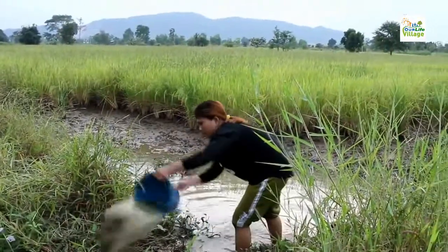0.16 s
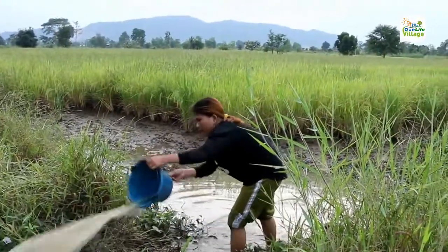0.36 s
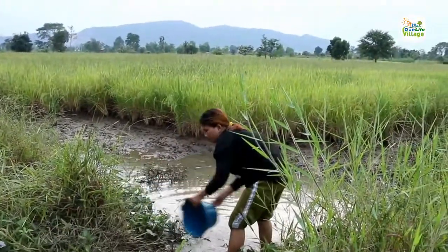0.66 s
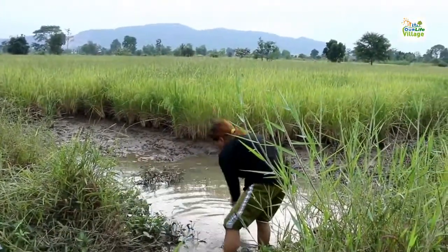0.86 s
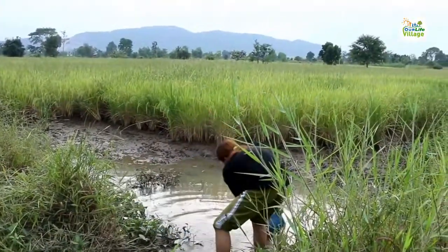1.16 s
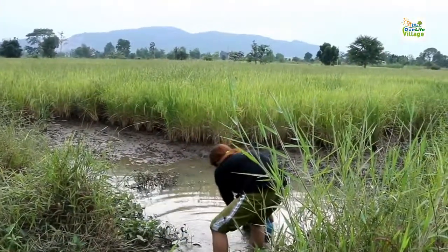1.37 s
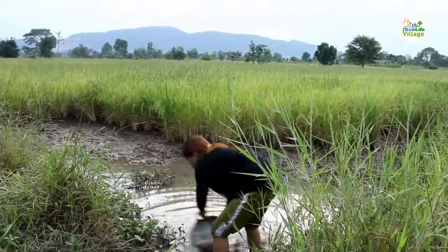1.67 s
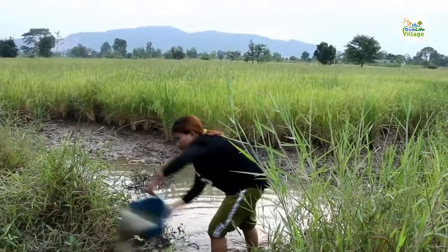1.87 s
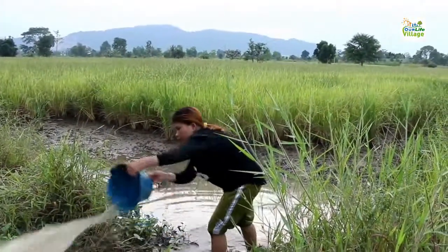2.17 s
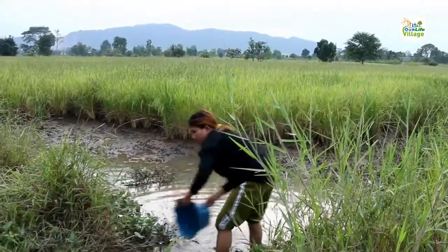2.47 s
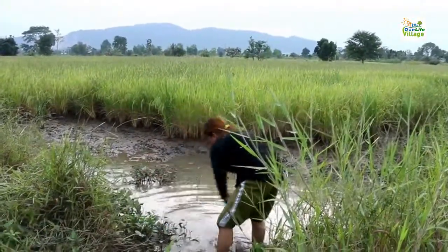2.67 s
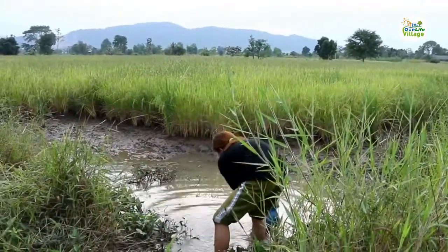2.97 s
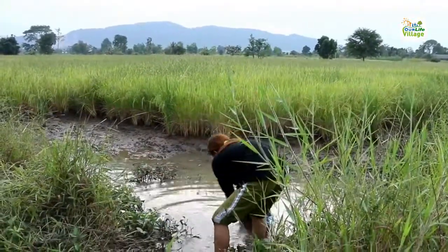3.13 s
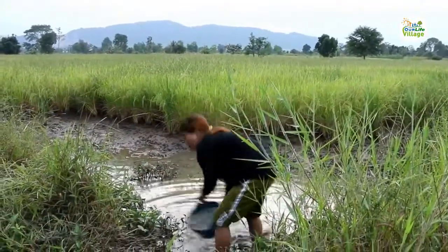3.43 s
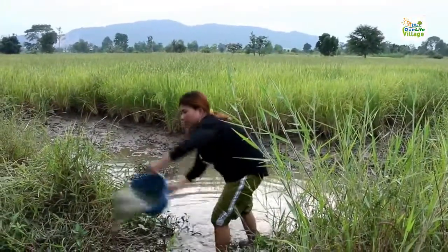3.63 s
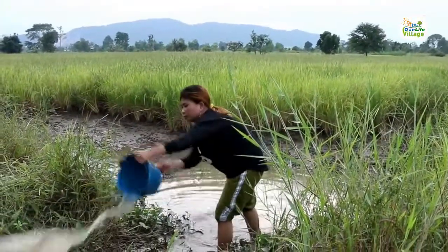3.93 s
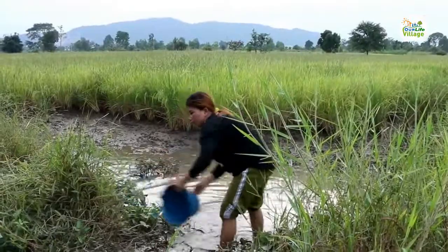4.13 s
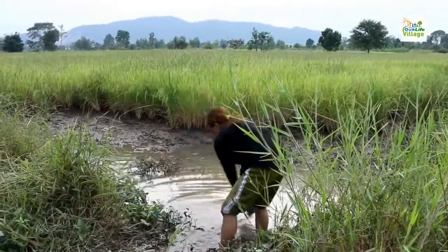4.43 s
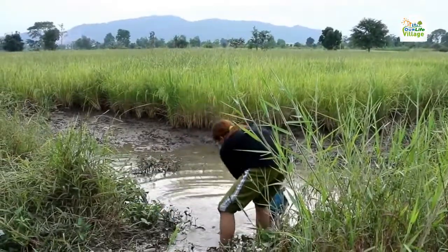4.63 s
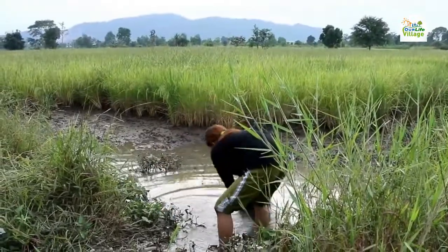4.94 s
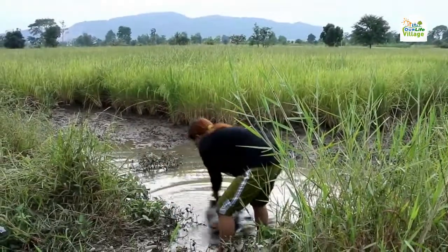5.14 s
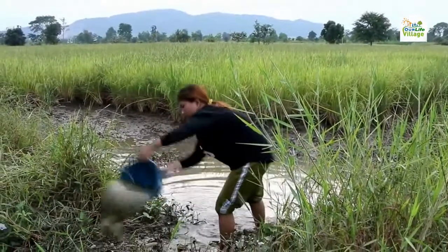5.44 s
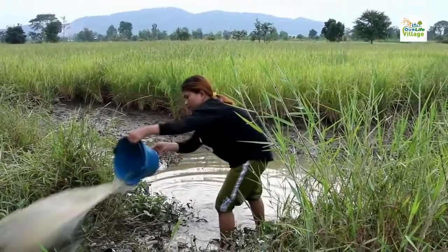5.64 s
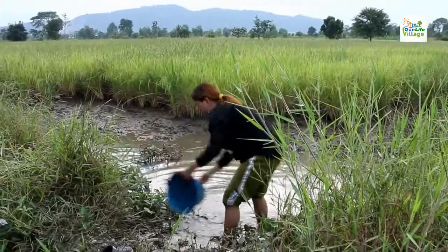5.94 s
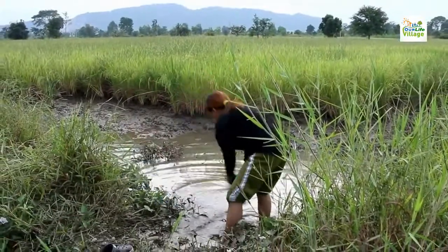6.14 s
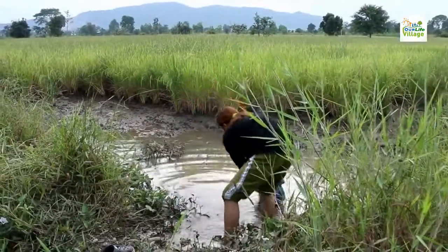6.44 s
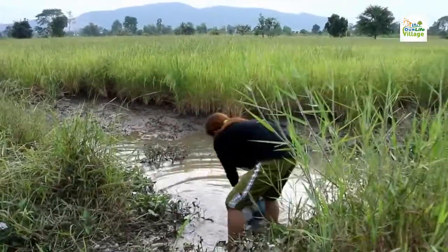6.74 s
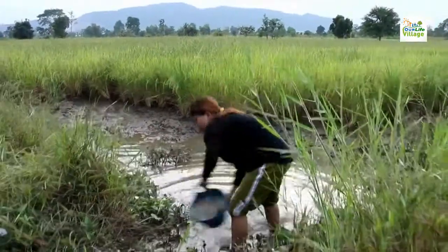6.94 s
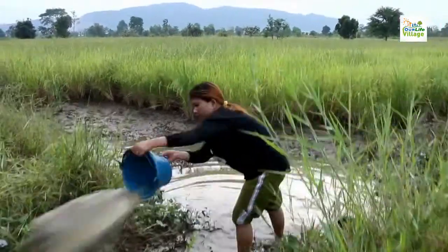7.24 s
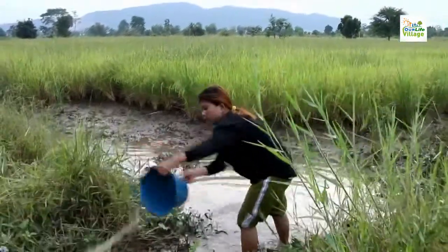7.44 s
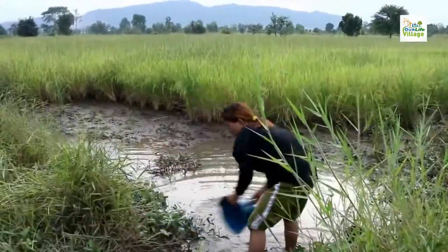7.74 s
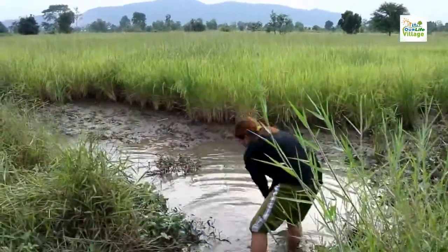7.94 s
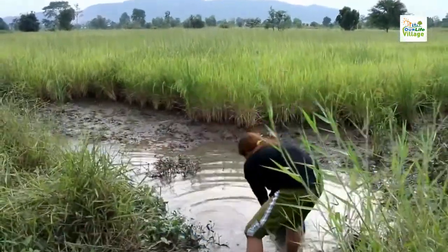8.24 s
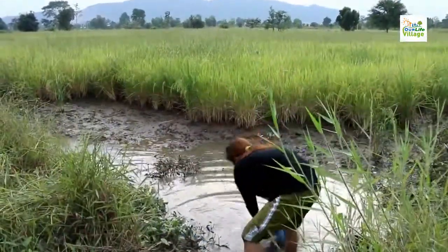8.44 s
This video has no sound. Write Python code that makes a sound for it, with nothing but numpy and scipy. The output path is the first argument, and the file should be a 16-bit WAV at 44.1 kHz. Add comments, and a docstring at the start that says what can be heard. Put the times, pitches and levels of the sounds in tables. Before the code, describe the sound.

Muddy pond water is scooped with a plastic basin and flung splashing onto the bank, five times in steady rhythm, over low distant traffic rumble.

```python
"""At the edge of a shallow muddy pond, two microphones: far traffic rumbles and hisses (shaped noise) and insects
buzz in the grass (chopped, ringing noise) throughout, while water fizzes and gurgles close by (rains of tiny bubbles).
Gulps and drips (rising, damped sines with noise splats) start at once; from 0.4 s a plastic basin flings
water on the bank to the left, five times (bubble rains and noise under landing curves).
At 2.75 s a bird calls once, a gliding sine."""
import sys
import numpy as np
from scipy import signal
from scipy.fft import rfft, irfft, next_fast_len
from scipy.io import wavfile
from scipy.ndimage import uniform_filter1d, map_coordinates

SR = 44100
rng = np.random.default_rng(int(sys.argv[2]) if len(sys.argv) > 2 else 0)


def dump(signal):
    """Clip the signal to [-1, 1] and save it as 16-bit WAV at the path in sys.argv[1]."""
    limited = np.clip(np.atleast_2d(signal).T, -1, 1)
    pcm = np.round(limited * 32767).astype(np.int16)
    wavfile.write(sys.argv[1], SR, pcm)


N = 379260
MS = np.arange(0, N / SR + .002, .001)  # the slow level curves are read every millisecond [s]

# Levels stand before the random flicker, pond reflection and microphone colour; spectra are relative levels.
# far road: (time [s], rumble level [dB], tyre hiss level [dB], passing lorry hiss level [dB])
ROAD_LEVELS = [(0, -42.5, -45, -50.5), (.7, -38, -46.5, -51), (1.6, -38.5, -45.5, -58),
               (2.3, -38.5, -50, -49.5), (3.5, -37.5, -46.5, -53.5), (4.4, -35, -47.5, -48),
               (5.3, -39.5, -44, -66), (6.05, -39, -47, -53.5), (6.7, -38.5, -43.5, -53.5),
               (8.07, -43, -45.5, -59), (8.6, -38, -43, -59)]
# spectra of engine rumble, tyre hiss and lorry hiss: (frequency [Hz], level [dB per Hz])
RUMBLE_SPECTRUM = [(13, -43), (22, -19.5), (87, 1), (130, 3), (166, -1), (216, -6.5), (420, -22.5),
                   (550, -40), (920, -120)]
TYRE_SPECTRUM = [(220, -7), (380, -17), (430, -10), (579, -10.5), (854, 0), (967, 1), (1080, -6),
                 (1240, -4.5), (1570, -14), (2110, -13), (3520, -24), (6990, -26.5), (7910, -21.5),
                 (14500, -44), (15700, -54)]
LORRY_SPECTRUM = [(900, -49), (1150, 2), (1350, 6), (1550, -1), (1950, -3), (2300, -27.5)]
# insect wing resonances: (frequency [Hz], width [Hz], level [dB])
WING_BANDS = [(7800, 480, 6), (8970, 730, 3), (11900, 4000, -13)]
# thin run-off that swells and thins between throws: (time [s], fizz level [dB], gurgle level [dB])
TRICKLE_LEVELS = [(0, -52, -49), (.34, -49, -52), (.39, -54, -58), (.9, -52, -61), (1.29, -72, -59),
                  (1.6, -61, -54), (1.93, -47, -49.5), (2.16, -59, -50.5), (2.75, -54.5, -52),
                  (3.1, -65, -54.5), (3.45, -54, -53), (3.74, -54.5, -52.5), (4.45, -63, -63),
                  (5.0, -70, -59), (5.48, -44.5, -51), (5.68, -54, -66), (6.25, -62, -69), (6.75, -81, -62),
                  (7.0, -62, -58), (7.35, -53, -64), (7.88, -53.5, -64), (8.2, -74, -78), (8.6, -67, -67)]
# water spilling back from basin and legs:
# (time [s], length [s], fizz level [dB], gurgle level [dB], churn level [dB])
SPILL_EVENTS = [(0, 0.056, -53.5, -47, -70), (0.267, .01, -44, -49, -44), (1.402, 0.0099, -64, -44, -39),
                (1.434, .02, -67, -53, -36), (1.51, .015, -58, -53, -48), (1.66, .02, -57, -48, -47),
                (1.754, 0.019, -46.5, -37, -54), (1.886, 0.038, -44, -45, -53), (1.98, .004, -43, -53, -62),
                (2.015, .02, -40.5, -45, -50), (2.121, .008, -58, -43.5, -51), (2.712, .004, -66, -54, -59),
                (2.884, .006, -66, -50, -50), (3.163, .025, -57, -50, -37), (3.385, .03, -55, -46, -40.5),
                (3.483, 0.038, -51.5, -52, -49), (3.529, .07, -55, -51, -64),
                (3.796, 0.023, -53, -49.5, -46), (4.822, 0.032, -56, -53, -48),
                (5.1, 0.023, -51, -44.5, -43), (5.268, .006, -49.5, -50, -55),
                (5.382, .04, -44.5, -47.5, -56), (5.474, 0.011, -41, -44, -48),
                (5.604, 0.0037, -51, -36.5, -44.5), (5.64, .004, -55, -52, -53),
                (6.165, 0.0037, -45.5, -48, -48), (6.258, 0.011, -61, -62, -44), (6.55, .2, -75, -64, -50),
                (6.804, .006, -54, -62, -43.5), (6.881, 0.011, -64, -51, -41),
                (6.937, 0.038, -53, -55, -46), (7.064, .006, -58, -45.5, -55),
                (7.228, .02, -45.5, -53, -48), (7.288, .02, -47.5, -48, -43.5), (7.94, .006, -65, -52, -52),
                (8.272, 0.054, -63, -64, -46), (8.522, .006, -55, -46, -53), (8.567, .05, -54, -50, -33)]
# spectra of fizz, gurgle and churn in the basin: (frequency [Hz], level [dB per Hz])
FIZZ_SPECTRUM = [(1470, -15), (2500, -2), (3670, -3.5), (4030, 1), (4420, -5), (5780, -7.5), (7170, -8.5),
                 (10500, -14.5), (15700, -24)]
GURGLE_SPECTRUM = [(250, -30), (450, -14), (1000, -0.5), (1800, 2.5), (2800, -1.5), (4500, -11.5),
                   (7000, -40)]
CHURN_SPECTRUM = [(150, -48), (280, 3.5), (400, 5.5), (600, -3), (1000, 3), (1500, -53)]
# big bubbles, then drips:
# (time [s], bubble peak level [dB], starting pitch [Hz], splat against bubble before SPLAT_GAIN [dB])
GULP_EVENTS = [(0.038, -34.5, 723, -7), (0.411, -33, 1010, -13), (0.531, -34, 816, -9),
               (0.575, -21, 1000, -7), (0.623, -16.5, 1020, 5.5), (1.409, -23, 369, -6),
               (1.44, -23, 360, 0.5), (1.573, -29, 874, -10), (1.663, -33, 382, -8),
               (1.754, -33.5, 886, -5), (2.12, -36, 1110, -4), (2.202, -31, 1060, -7),
               (2.352, -33, 991, -11), (2.419, -16.5, 357, -6), (3.161, -26, 374, 0.5),
               (3.223, -35, 372, -1), (3.969, -36, 1070, -8), (4.117, -26, 990, -11),
               (4.156, -20.5, 870, -1), (5.192, -34, 850, 1), (5.23, -32.5, 1020, -4),
               (5.715, -33, 1095, -3), (5.909, -15, 387, 0), (7.005, -32, 1010, -7),
               (7.051, -37.5, 740, -5), (7.354, -33, 996, -8), (7.542, -23, 320, -9),
               (7.934, -34.5, 990, -5), (8.246, -34, 945, 0), (8.278, -39, 918, -1), (8.437, -37, 980, -8),
               (8.519, -36, 956, -6), (8.542, -37, 875, -7), (8.563, -25.5, 514, -6)]
DRIP_EVENTS = [(0.127, -37.5, 2860, 6), (0.2653, -30.5, 3720, -5), (0.402, -33, 3020, 6),
               (0.5344, -26, 3300, -9), (0.5641, -20, 2110, -4), (1.412, -31, 1720, -3),
               (1.441, -37, 1880, -19), (1.6412, -40, 1890, 4), (1.6836, -23.5, 1380, -7),
               (1.7463, -34, 2600, 3), (1.7719, -27.5, 3340, -7), (1.8103, -34, 4250, -15),
               (1.8836, -37, 2010, -8), (1.9844, -28, 2040, -3), (2.06, -32, 2560, 1),
               (2.119, -37, 1720, -11), (2.1965, -38, 3000, -10), (2.2388, -29, 3020, -3),
               (2.302, -33, 2450, -17.5), (2.377, -28, 2170, -8), (3.083, -32.5, 1550, -16),
               (3.3823, -33, 1590, -11), (3.488, -37, 2480, -11), (3.7527, -32, 1370, -17),
               (3.7868, -35, 1590, -15), (3.832, -34, 1700, -14), (4.0891, -23, 1310, -7),
               (4.8406, -38.5, 1860, -7), (4.8604, -34, 1520, -17), (4.9791, -37, 2040, -10),
               (5.1023, -35, 2080, -4), (5.39, -29.5, 4560, -11), (5.4156, -36, 2880, -9),
               (5.6047, -32.5, 1910, -6), (5.6396, -30.5, 2910, -2), (5.7099, -35, 1340, -3),
               (5.7262, -32, 1340, -3), (5.831, -18, 1430, -8), (5.887, -20, 1440, 0),
               (6.1745, -30.5, 1530, -19), (6.806, -27, 1270, -6), (6.9458, -35.5, 2460, -4),
               (7.2315, -29.5, 2130, -2), (7.2848, -38, 1680, -10), (7.3836, -30.5, 4260, 1),
               (7.5155, -30, 1470, -6), (7.9354, -30, 1370, -19), (8.2312, -40, 1880, -10),
               (8.345, -45, 5170, -6), (8.5629, -29, 1480, -18)]
# spectra of the gulp and drip splats: (frequency [Hz], level [dB])
GULP_SPLAT_SPECTRUM = [(200, -25), (400, -14.5), (1000, 12), (2000, -9), (4000, -10), (9000, -69)]
DRIP_SPLAT_SPECTRUM = [(800, -30), (1500, -24), (3500, 12), (6000, -10), (12000, -21)]
# each throw on the bank: (first drops land [s], for [s], their slap level [dB], late drops level [dB],
# swell time factor [x], main mass lands [s], for [s], spray level [dB], spatter level [dB], slosh level [dB],
# thud on the mud [s], for [s], thud level [dB])
THROW_EVENTS = [(0.401, 0.064, -40.5, -42.5, 0.64, 0.5765, 0.071, -33.5, -27.5, -26.5, 0.591, .035, -27),
                (2.199, .06, -42, -40.5, 1.07, 2.418, 0.01, -29.5, -25, -20.5, 2.41, 0.0064, -21),
                (3.965, .04, -44, -42, 0.94, 4.163, .014, -28, -24.5, -21.5, 4.158, 0.019, -27),
                (5.73, .05, -40.5, -42.5, 1.05, 5.91, 0.026, -30.5, -23.5, -23, 5.908, 0.019, -21),
                (7.386, .06, -39.5, -42, .95, 7.568, 0.053, -29, -26.5, -23, 7.565, 0.044, -27)]
# course of a landing, one row each for spray, spatter, slosh and thud; times are for 60 dB:
# (added to slap level [dB], swell before the swell factor [s], collapse [s],
# added to late drops level [dB], their fade [s])
LANDING_SHAPES = [(-8, 0.71, 0.23, -1.5, 1.66), (-0.5, 0.46, .2, -0.5, 1.5), (-0.5, 0.28, .2, 5.5, 0.7),
                  (-4.5, .16, .11, 1.5, 0.53)]
# spectra of the four landing layers: (frequency [Hz], level [dB per Hz])
SPRAY_SPECTRUM = [(2350, -32), (4000, -2.5), (5120, 1.5), (6210, -4), (8710, -7.5), (10300, -8.5),
                  (15100, -17.5), (15700, -23)]
SPATTER_SPECTRUM = [(1060, -18), (1800, -5), (2470, 0), (2750, -5), (3300, -2), (4000, -15), (5200, -23),
                    (8800, -120)]
SLOSH_SPECTRUM = [(320, -37), (550, -19), (694, -10), (1020, -1.5), (1230, -8.5), (1360, -4.5), (1500, -9),
                  (1800, -12), (2340, -47), (3960, -120)]
THUD_SPECTRUM = [(82, -44), (140, -3.5), (351, 3), (399, -2), (499, -3), (650, -15), (840, -33),
                 (1430, -120)]
# the one bird call: (time [s], pitch [Hz], rms level [dB])
BIRD_CALL = [(2.752, 3950, -66), (2.76, 3860, -52), (2.772, 3200, -51), (2.787, 2880, -49),
             (2.797, 2776, -62), (2.808, 2600, -70), (2.82, 2350, -52), (2.83, 2480, -57),
             (2.848, 2700, -47), (2.858, 3120, -49), (2.876, 2620, -46), (2.896, 2820, -48),
             (2.906, 2850, -76)]
# likeness of the two microphones for far and near sounds: (frequency [Hz], left-right likeness [-1 to 1])
FAR_LIKENESS = [(60, 0.93), (130, 0.98), (290, 0.97), (640, 0.93), (1410, 0.91), (3100, 0.078),
                (6820, -0.4), (15000, 0.12)]
NEAR_LIKENESS = [(200, 0.97), (1000, 0.9), (3000, 0.6), (8000, 0.19), (15000, 0.3)]
# colour of the microphone pair: (frequency [Hz], left minus right [dB])
MICROPHONE_PAIR = [(60, -3), (130, -2.5), (290, -1.5), (640, -0.5), (1410, -1.5), (3100, 0.0), (6820, 0),
                   (15000, -0.5)]

LAPPING_DB = -58.5  # constant churn: the pond never quite settles
SPILL_RISE, SPILL_FALL = [0.054, 0.037, 0.043], [.24, 0.1, .17]  # s for 60 dB: fizz, gurgle, churn
GULP_T60, DRIP_T60 = 0.061, .021  # bubble decay, s for 60 dB
SPLAT_GAIN = 0.43
SLAP_RISE, SLAP_FALL = .04, .4  # s for 60 dB
FIRST_DROPS_S = .008  # fade-in ahead of the first drops
BANK_LEAD = 1e-4  # s, a throw reaches the left microphone earlier
TOP_HZ = 15830  # band limit of the microphones


def amp(db):
    """Decibels to gain."""
    return 10 ** (np.asarray(db) / 20)


def unit(x):
    """x at rms 1."""
    return x / np.sqrt(np.mean(x ** 2) + 1e-20)


def noise_pair():
    """Two unrelated white noises."""
    return rng.standard_normal((2, N))


def along(points, hz):
    """Read (Hz, value) points on a log frequency axis."""
    f, v = np.transpose(points)
    return np.interp(np.log(hz + 1), np.log(f + 1), v)


def wobble(rate):
    """A smooth random curve, rate knots a second."""
    knots = rng.standard_normal(int(N * rate / SR) + 4)
    return map_coordinates(knots, [np.arange(N) * rate / SR])


def filtered(x, response):
    """x through a complex response of frequency."""
    m = next_fast_len(N + 8192)
    hz = np.fft.rfftfreq(m, 1 / SR)
    return irfft(rfft(x, m) * response(hz), m)[..., :N]


def spread(pair, spectrum, alike, lead=0):
    """Colour two unrelated signals into a stereo pair of rms 1; the left hears it lead seconds early."""
    m = next_fast_len(N + 8192)
    hz = np.fft.rfftfreq(m, 1 / SR)
    turn = np.arccos(np.clip(along(alike, hz), -1, 1)) / 2  # mid-side mix that gives the likeness
    mid, side = rfft(pair, m) * amp(along(spectrum, hz)) * [np.cos(turn), np.sin(turn)]
    early = np.exp(1j * np.pi * hz * lead)  # half the lead on each side
    return unit(irfft([(mid + side) * early, (mid - side) / early], m)[:, :N])


def patchy(pair, depth_db):
    """Random louder and softer patches in time and pitch, giving any hiss an uneven grain."""
    z = signal.stft(pair, nperseg=256)[2]
    field = uniform_filter1d(rng.standard_normal(z.shape[1:]), size=3, axis=0)
    field = uniform_filter1d(field, size=4, axis=1)
    return unit(signal.istft(z * amp(depth_db * unit(field)), nperseg=256)[1][:, :N])


def curves(rows):
    """The columns after the time, read every millisecond."""
    s, *cols = np.transpose(rows)
    return np.array([np.interp(MS, s, c) for c in cols])


def gains(power):
    """Millisecond powers to one gain per sample."""
    return [np.interp(np.arange(N) / SR, MS, np.sqrt(p)) for p in power]


def traffic():
    """A distant road: lumpy low engine rumble, tyre hiss and the hiss of a passing lorry, all shaped noise."""
    rumble_gain, tyre_gain, lorry_gain = gains(amp(2 * curves(ROAD_LEVELS)))
    lumps = amp(1.37 * wobble(3.1) + 0.64 * wobble(11))
    rumble = lumps * spread(noise_pair(), RUMBLE_SPECTRUM, FAR_LIKENESS)
    tyres = spread(patchy(noise_pair(), depth_db=1.0), TYRE_SPECTRUM, FAR_LIKENESS)
    lorry = spread(patchy(noise_pair(), depth_db=1.5), LORRY_SPECTRUM, FAR_LIKENESS)
    return rumble_gain * rumble + tyre_gain * tyres + lorry_gain * lorry


def wing_resonance(hz):
    """Sum of the wing bands, each a resonance passed twice."""
    total = 0
    for centre, width, db in WING_BANDS:
        damping = 1j * hz * width
        total = total + amp(db) * (damping / (centre * centre - hz * hz + damping)) ** 2
    return total


def insects():
    """Wing strokes, about 66.6 a second, chop a hiss that rings in two narrow bands and a weak broad one."""
    strokes = np.cos(np.pi * 66.6 * np.arange(N) / SR + 0.9 * wobble(2.66)) ** 4
    buzz = (0.5 + strokes) * noise_pair()
    level_drift = amp(.8 * wobble(2))
    return amp(-60) * level_drift * unit(filtered(buzz, wing_resonance))


def swell(start, hold, rise, fall):
    """dB under the peak: climbs to start, holds, then dies away; rise and fall are 60 dB times."""
    before = np.maximum(start - MS, 0)
    after = np.maximum(MS - start - hold, 0)
    return -60 * (before / rise + after / fall)


def runoff():
    """Gains of fizz, gurgle and churn: changing trickle and constant lapping with every spill's power on top."""
    power = amp(2 * np.vstack([curves(TRICKLE_LEVELS), LAPPING_DB + 0 * MS]))
    for s, hold, *db in SPILL_EVENTS:
        spill_db = np.c_[db] + swell(s, hold, np.c_[SPILL_RISE], np.c_[SPILL_FALL])
        power = power + amp(2 * spill_db)
    return gains(power)


def droplets(count, size, cycles, low_hz, high_hz, uneven_db, wash):
    """Two rains of tiny bubbles, each a short rising damped sine, over a wash of noise; wash is its power share."""
    draw = rng.random((2, count, 3))  # moment, pitch, strength
    hz = low_hz * (high_hz / low_hz) ** draw[..., 1:2]
    life = np.arange(size) / SR * hz / cycles
    strength = amp(-uneven_db * np.log(draw[..., 2:] + 0.044)) * hz  # equal energy per hertz
    tone = np.sin(2 * np.pi * cycles * life * (1 + 0.053 * life))
    ring = strength * life * np.exp(-5 * life) * tone
    at = (draw[..., :1] * N).astype(int) + np.arange(size)
    rain = np.array([np.bincount(a.ravel(), r.ravel(), N + size)[:N] for a, r in zip(at, ring)])
    share = np.clip(wash, 0, 1)
    return np.sqrt(1 - share) * unit(rain) + np.sqrt(share) * patchy(noise_pair(), depth_db=1.5)


def mirrored(x):
    """The pond's surface sends a duller second copy just after the first, which combs the colour."""
    delay, share, dull_hz = .0011, .48, 5000  # s, gain, Hz
    return filtered(x, lambda hz: 1 + share * np.exp(-2j * np.pi * hz * delay) / np.hypot(1, (hz / dull_hz) ** 2))


def dribble():
    """Thin streams fall back in bursts: a fine fizz, a gurgle of larger bubbles, water churning in the basin."""
    fizz, gurgle, churn = runoff()
    bursts = wobble(30)
    fine = droplets(count=5000, size=192, cycles=13.4, low_hz=2230, high_hz=12840, uneven_db=1.5, wash=0.79)
    coarse = droplets(count=2500, size=512, cycles=9, low_hz=600, high_hz=4500, uneven_db=2.5, wash=.55)
    streams = fizz * amp(2.1 * bursts) * spread(fine, FIZZ_SPECTRUM, NEAR_LIKENESS)
    streams += gurgle * amp(1.3 * bursts) * spread(coarse, GURGLE_SPECTRUM, NEAR_LIKENESS)
    basin = churn * spread(patchy(noise_pair(), depth_db=5.5), CHURN_SPECTRUM, NEAR_LIKENESS)
    return mirrored(streams) + basin


def bubbles(rows, t60, rise, colour, splat_t60):
    """Each drop splats on the surface and traps a bubble whose pitch climbs as it dies."""
    rings, splats = np.zeros(N + SR), np.zeros((2, N + SR))
    t = np.arange(SR // 8) / SR
    for s, db, hz, splat_db in rows:
        first = round(s * SR)
        last = first + len(t)
        ring = np.sin(2 * np.pi * hz * t * (1 + rise * t / t60)) * amp(-60 * t / t60)
        rings[first:last] += amp(db) * ring
        splats[:, first:last] += amp(db + splat_db - 60 * t / splat_t60)
    wet = spread(noise_pair(), colour, NEAR_LIKENESS)
    return rings[:N] + SPLAT_GAIN * splats[:, :N] * wet


def gulps():
    """Big bubbles close round the basin ring low and long, each with a splat."""
    return bubbles(GULP_EVENTS, GULP_T60, rise=0.04, colour=GULP_SPLAT_SPECTRUM, splat_t60=0.047)


def drips():
    """Small bubbles under single drips ring high and short, doubled by the pond's surface."""
    return mirrored(bubbles(DRIP_EVENTS, DRIP_T60, rise=0.015, colour=DRIP_SPLAT_SPECTRUM, splat_t60=0.033))


def landings():
    """Gains of four layers: a slap of first drops, a swell to the main mass, its collapse and late drops."""
    share, rise, fall, late, fade = np.transpose(LANDING_SHAPES)[..., None]
    power = 0
    for first, patter, slap_db, late_db, drawn_out, lands, hold, *peak_db, thud_s, thud_hold, thud_db in THROW_EVENTS:
        peak = np.c_[peak_db + [thud_db]]
        start = np.c_[[lands] * 3 + [thud_s]]
        length = np.c_[[hold] * 3 + [thud_hold]]
        slap = slap_db + share + swell(first, patter, SLAP_RISE, SLAP_FALL)
        mass = peak + swell(start, length, drawn_out * rise, fall)
        drops = late_db + late + swell(start + length, 0, fall, fade)
        begun = np.clip((MS - first) / FIRST_DROPS_S + 1, 0, 1)
        power = power + amp(2 * slap) + begun * amp(2 * mass) + amp(2 * drops)
    return gains(power)


def throws():
    """The flung sheet of water breaks into spray and spatter, sloshes and thuds on the mud, off to the left."""
    spray, spatter, slosh, thud = landings()
    clumps = wobble(70)  # lumps of water land one after another
    fine = droplets(count=9000, size=128, cycles=4.8, low_hz=1400, high_hz=15100, uneven_db=0.5, wash=.65)
    coarse = droplets(count=2500, size=512, cycles=5.9, low_hz=508, high_hz=2750, uneven_db=-1.5, wash=.65)
    mud = patchy(noise_pair(), depth_db=5.0)
    nearer_left = amp([[.8], [-.8]])
    out = spray * amp(0.75 * clumps) * nearer_left * spread(fine, SPRAY_SPECTRUM, NEAR_LIKENESS, BANK_LEAD)
    out += spatter * amp(1.3 * clumps) * spread(fine, SPATTER_SPECTRUM, NEAR_LIKENESS, BANK_LEAD)
    out += slosh * amp(0.29 * clumps) * spread(coarse, SLOSH_SPECTRUM, NEAR_LIKENESS, BANK_LEAD)
    out += thud * amp(0.31 * wobble(44)) * spread(mud, THUD_SPECTRUM, NEAR_LIKENESS, BANK_LEAD)
    return out


def bird():
    """One thin gliding whistle, a sine whose phase follows the pitch, equal in both microphones."""
    s, hz, db = np.transpose(BIRD_CALL)
    t = np.arange(N) / SR
    tone = np.sin(2 * np.pi * np.cumsum(np.interp(t, s, hz)) / SR)
    level = amp(np.interp(t, s, db, -120, -120))
    flutter = amp(1.5 * wobble(60))
    return level * flutter * tone * np.sqrt([[2], [2]])  # root 2 brings a sine to rms 1


def scene():
    """Road, insects and bird far; water near."""
    return traffic() + insects() + dribble() + gulps() + drips() + throws() + bird()


def record(dry):
    """The two microphones differ a little in colour; nothing is kept above the band limit."""
    return filtered(dry, lambda hz: amp(np.outer([.5, -.5], along(MICROPHONE_PAIR, hz))) * (hz < TOP_HZ))


dry = scene()
out = record(dry)
dump(out)
```